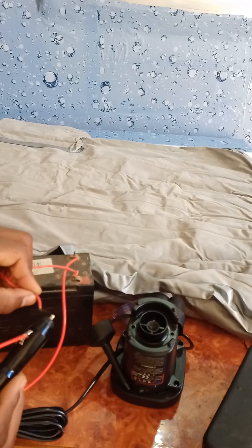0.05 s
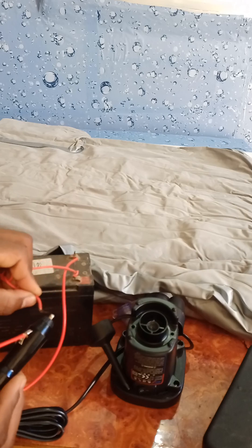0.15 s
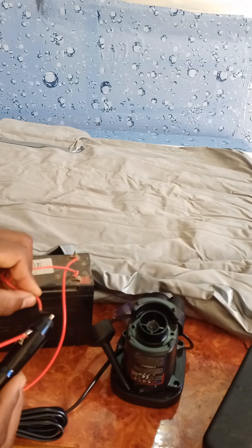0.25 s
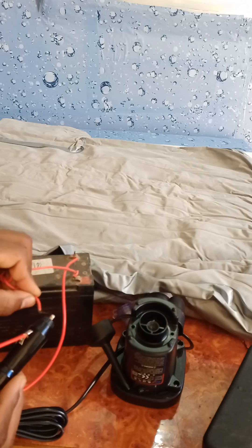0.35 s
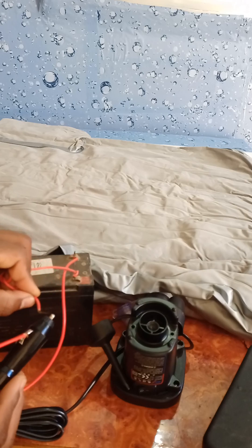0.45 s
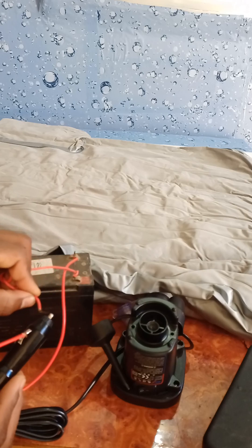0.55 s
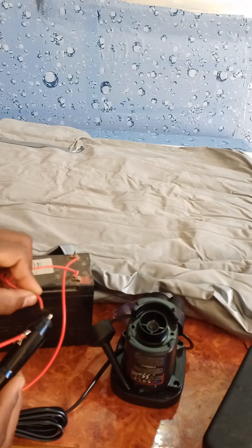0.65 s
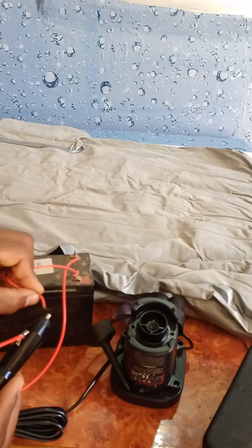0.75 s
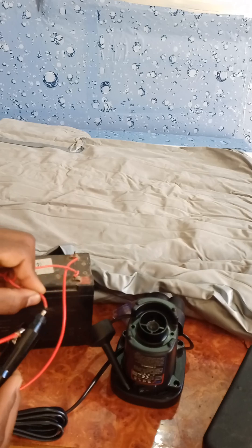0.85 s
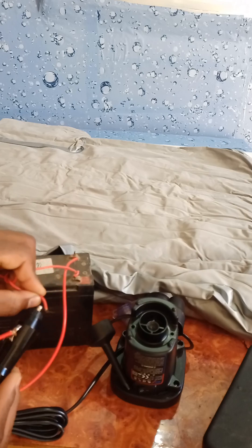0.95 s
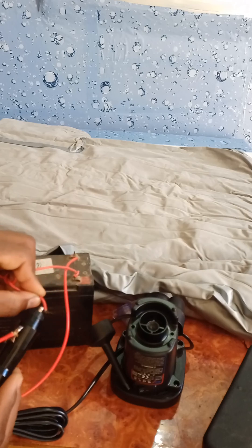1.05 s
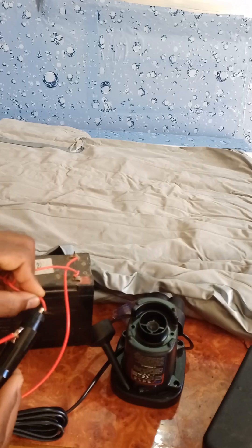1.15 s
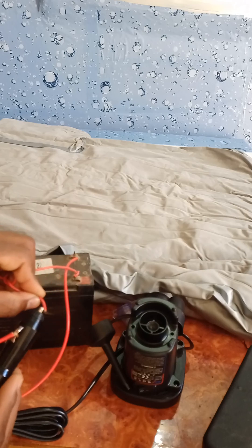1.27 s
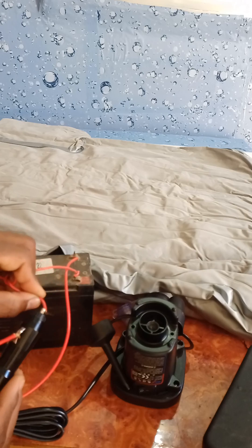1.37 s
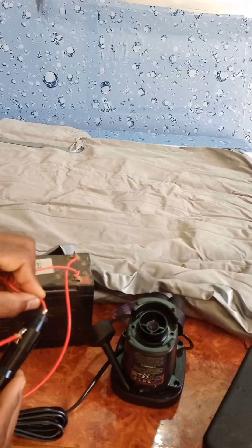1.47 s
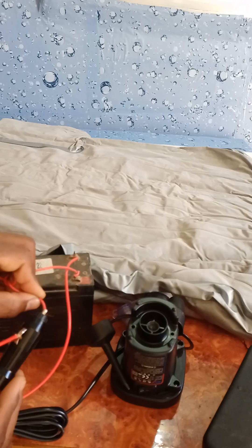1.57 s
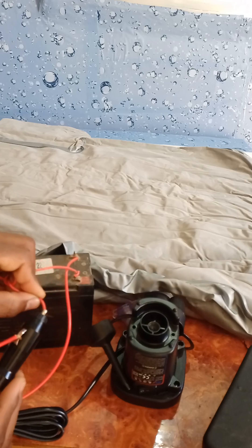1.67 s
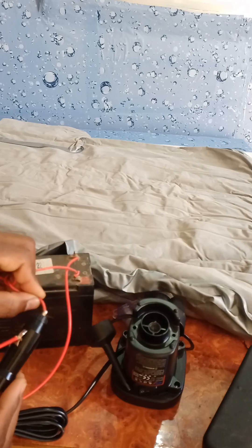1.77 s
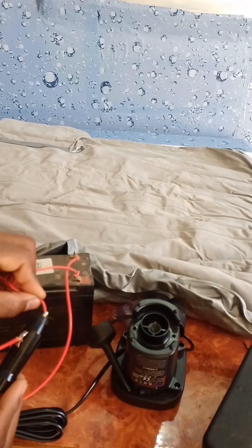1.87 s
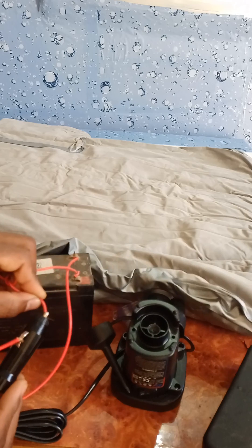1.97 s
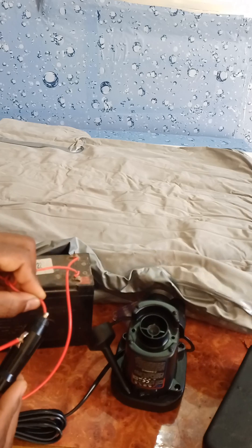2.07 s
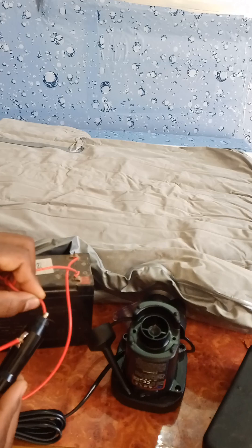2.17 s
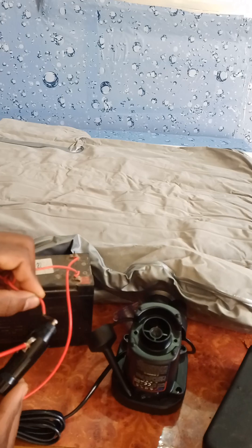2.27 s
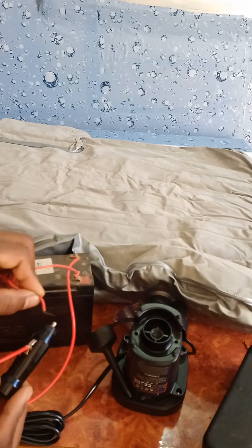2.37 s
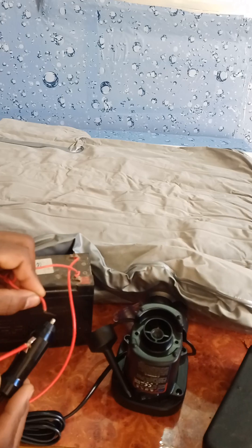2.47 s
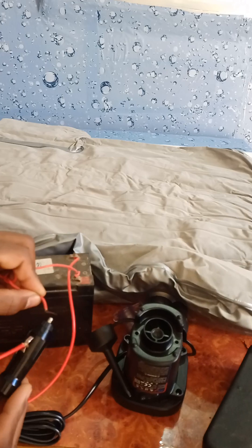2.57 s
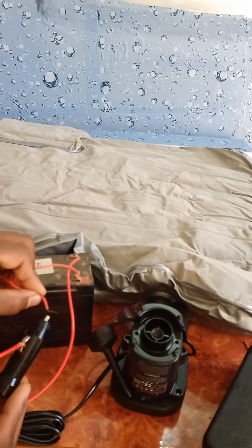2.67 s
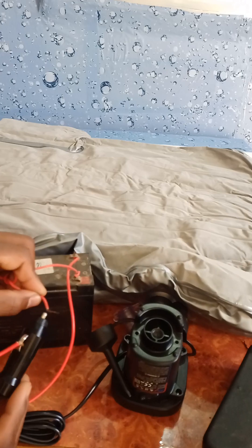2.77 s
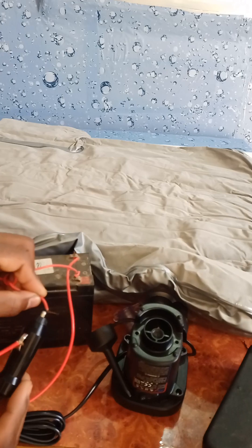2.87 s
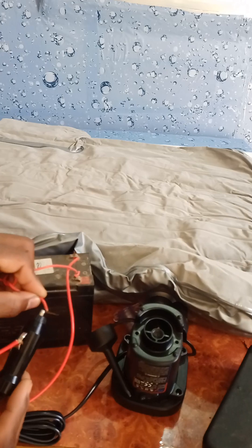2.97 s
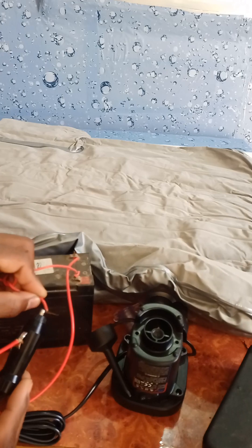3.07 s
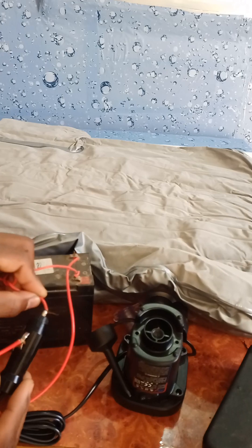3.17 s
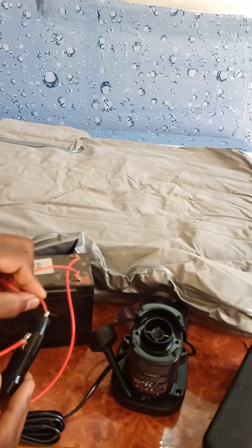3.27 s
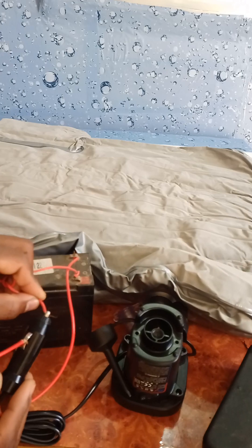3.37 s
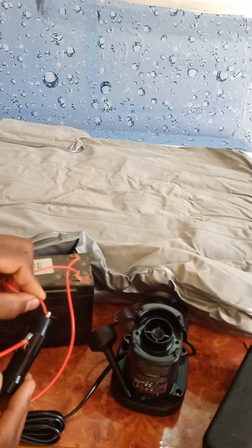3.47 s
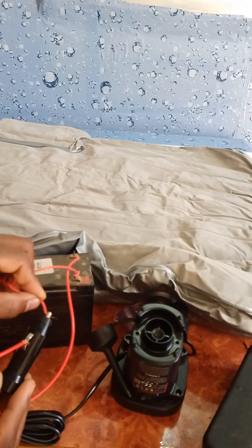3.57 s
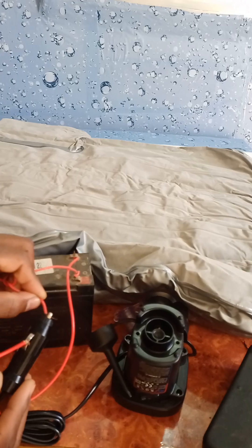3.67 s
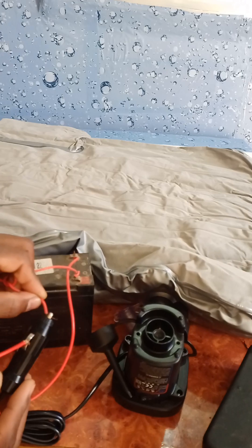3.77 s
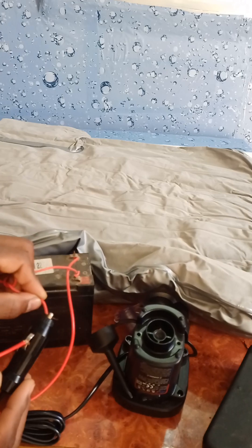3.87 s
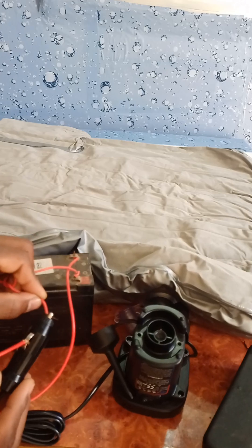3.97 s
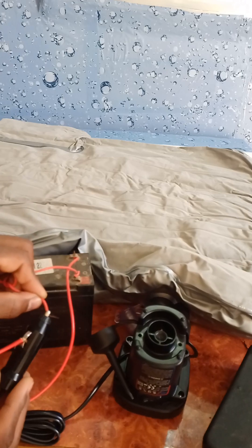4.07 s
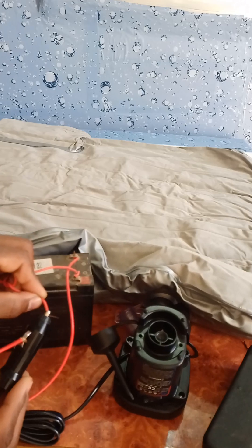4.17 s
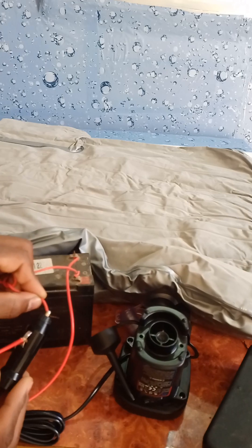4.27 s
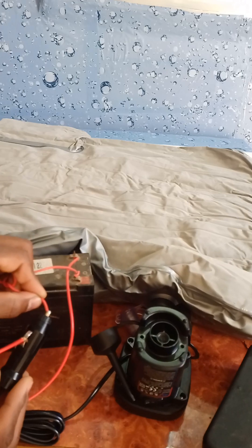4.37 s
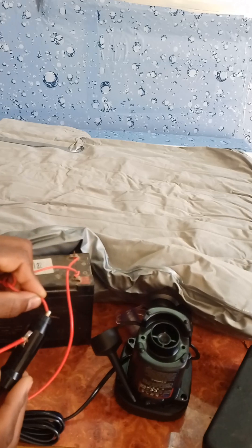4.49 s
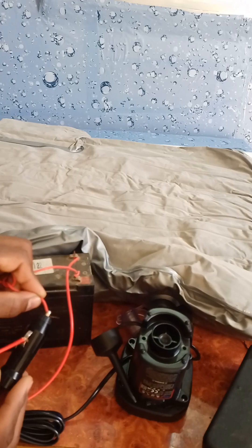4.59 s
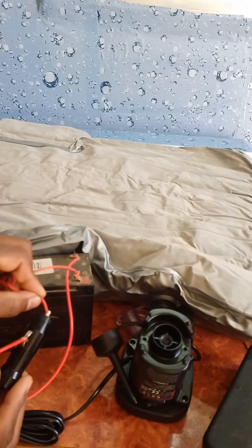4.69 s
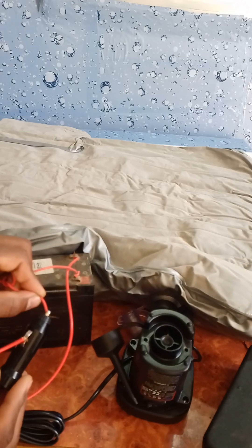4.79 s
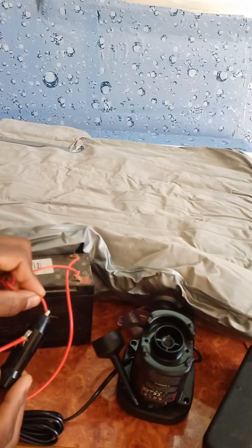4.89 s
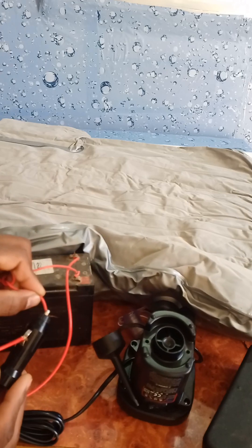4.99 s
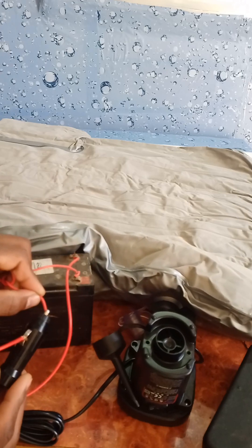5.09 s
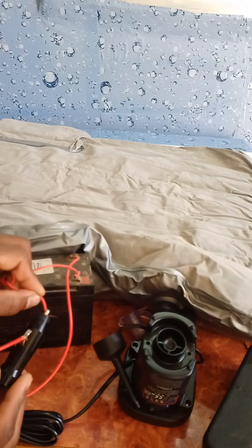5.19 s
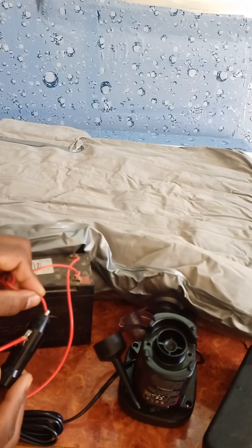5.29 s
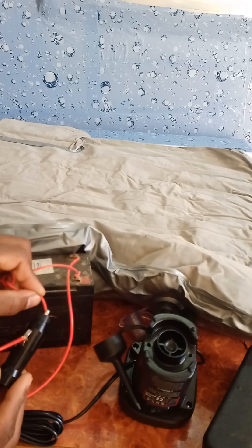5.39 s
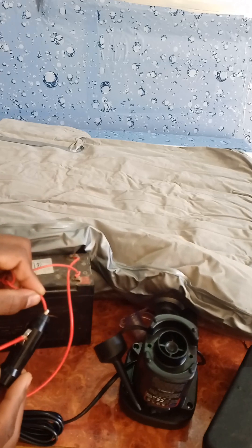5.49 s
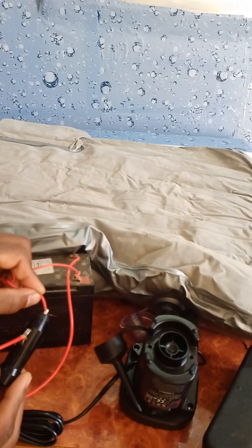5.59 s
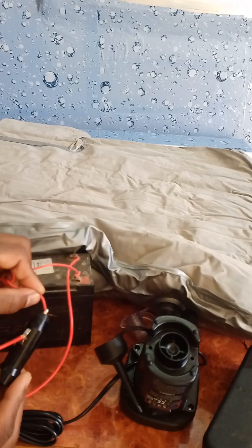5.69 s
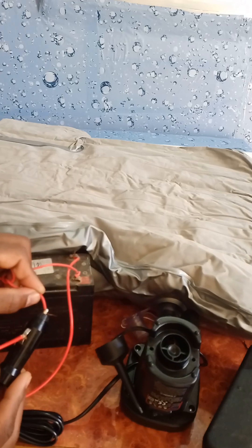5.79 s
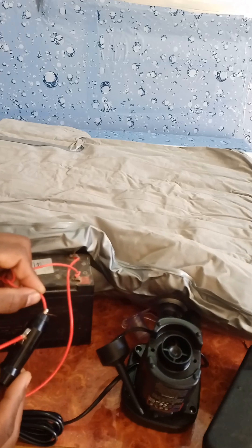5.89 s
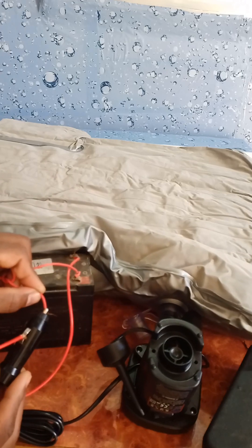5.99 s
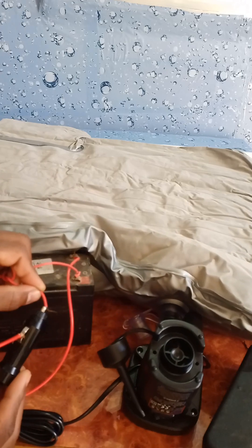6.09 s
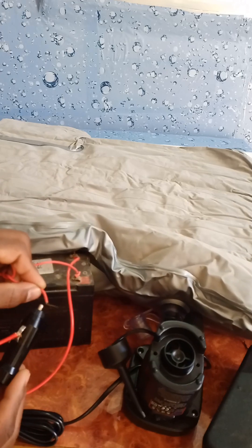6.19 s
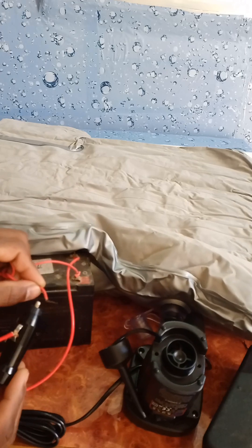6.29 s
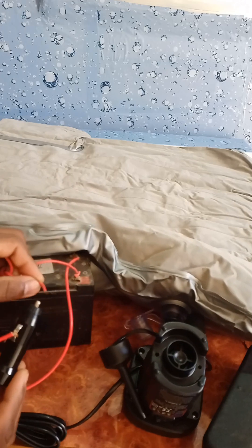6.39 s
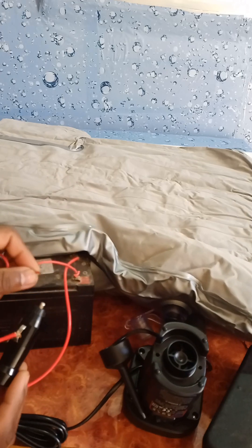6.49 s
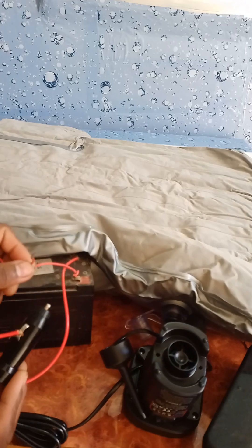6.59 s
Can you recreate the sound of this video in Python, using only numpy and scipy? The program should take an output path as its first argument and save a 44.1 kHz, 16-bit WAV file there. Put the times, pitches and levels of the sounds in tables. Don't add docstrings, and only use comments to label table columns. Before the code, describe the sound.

A quiet small room with faint hand shuffles on a mattress and a few dry metal clamp ticks. A small electric blower then spins up quickly into a bright whine with rushing air, coasts down with a base rattle, restarts and holds a longer, nearly steady high whine before beginning to wind down. A close hand-held phone drifts around the inlet, changing the brightness.

```python
import sys
import numpy as np
from scipy import signal
from scipy.fft import rfft, irfft
from scipy.io import wavfile
from scipy.ndimage import uniform_filter1d

SR = 44100
rng = np.random.default_rng(int(sys.argv[2]) if len(sys.argv) > 2 else 0)


def undo_db(level):
    steps = np.asarray(level, float) / 20
    return 10 ** steps


def int16_out(signal):
    q = np.round(np.clip(np.atleast_2d(signal).T, -1, 1) * 32767)
    wavfile.write(sys.argv[1], SR, q.astype(np.int16))


N = 292855
T = np.arange(N) / SR
F = np.fft.rfftfreq(N, 1 / SR)
BLADES = 6
FULL_SPEED_HZ = 339.5

# contact made in seconds, contact broken in seconds.
POWER_ON = [
    (1.4684, 2.3659),
    (3.3282, 6.2234),
]
# centre in Hz, width in Hz, level in dB.
HOUSING = [(336, 300, -14), (564, 279, 0), (1073, 470, -0.5), (1386, 238, 0), (1657, 282, -0.5),
           (2150, 1700, -8.5), (3008, 230, -4), (2830, 220, 2), (4110, 810, -7), (4682, 190, 1),
           (6110, 1830, -13), (5834, 178, -4), (5980, 1310, -6.5), (7450, 410, -10), (7400, 480, -58),
           (9165, 800, -11.5), (10120, 540, -13.5), (10970, 720, -19.5), (11960, 120, -15.5),
           (13200, 900, -31), (14700, 910, -37)]
# time in seconds, nearness in dB, aim at the inlet from 0 to 1,
# place in the narrow treble beam in dB.
PHONE = [(1.5, -2.5, 0.37, -1.5), (1.68, 4.5, 0.18, -30), (1.8, -2, 0.45, -12), (2.14, 7, 0.53, 0),
         (2.33, 2, 0.28, 3.5), (2.6, -2.5, 0.6, -13), (3.1, -1.5, 0.08, -23), (3.5, -4.5, 0.37, -10.5),
         (4.05, 3, 0.22, 5), (4.35, -4, 0, -4), (4.6, 3, 0.3, 0.5), (4.8, 1, .4, -2.5),
         (4.95, 2.5, 0.61, 3.5), (5.13, -0.5, 0.94, -7), (5.32, 1.5, 0.88, 4), (5.8, -3, 0.96, 3),
         (6.2, -1, 0.65, 2), (6.6, -1.5, 0.25, -24)]


def unit(x):
    return x / np.sqrt(np.mean(x ** 2))


def curves(table):
    s, *columns = np.transpose(table)
    return [np.interp(T, s, c) for c in columns]


def resonance(f, hz, width):
    return 1 / (1 + (2 * (f - hz) / width) ** 2)


def coloured(gain):
    return unit(irfft(rfft(rng.standard_normal(N)) * gain, N))


def walk(rate_hz):
    return coloured(resonance(F, 0, 2 * rate_hz))


def movements():
    # start in seconds, hold in seconds,
    # shuffle in dB, cloth in dB, hiss in dB.
    shuffles = [
        (0.0, 0.11, -57, -69, -78),
        (.12, .02, -56, -73, -74),
        (.83, 0.13, -63.5, -78, -81.5),
        (0.963, .1, -65, -72, -76),
        (1.214, .04, -71, -77, -80),
        (1.32, 0.084, -63.5, -76, -84),
        (1.508, 6, -56.5, -46, -58),
    ]
    rise_db_s, fall_db_s, still_db = 500, 69, -90
    out = undo_db(still_db)
    for s, hold, *db in shuffles:
        before = np.clip(s - T, 0, None)
        after = np.clip(T - s - hold, 0, None)
        under_db = rise_db_s * before + fall_db_s * after
        out = np.maximum(out, undo_db(np.array(db)[:, None] - under_db))
    return out


def background():
    # frequency in Hz, level in dB per Hz.
    room_tone = [(18, -62), (30, -34), (102, -6), (123, -12.5), (505, -13.5), (546, -24), (591, -15),
                 (639, -21), (787, -24), (1680, -27), (15500, -41)]
    room_db = -64.5
    shuffle, cloth, hiss = movements()
    hz, db = np.transpose(room_tone)
    room = undo_db(room_db - 7.5) * coloured(undo_db(np.interp(np.log(F + 1), np.log(hz), db)))
    box = resonance(F, 340, 40) + 1.46 * resonance(F, 397, 60) + 0.93 * resonance(F, 242, 33)
    shuffle = shuffle * undo_db(-2.0 + 1.1 * walk(15)) * coloured(box)
    cloth = cloth * undo_db(-3.5 + 0.99 * walk(10)) * coloured(resonance(F, 1000, 1600))
    hiss = hiss * undo_db(2.5 + 1.5 * walk(11)) * coloured(resonance(F, 5200, 6000))
    return room + shuffle + cloth + hiss


def clamp():
    # start in seconds, peak in dB, treble in dB, dull knock in dB.
    ticks = [
        (1.0304, -41, -13, -31),
        (1.0829, -44, -23, -31),
        (1.4137, -60, -21, -17),
        (1.4601, -48, 1, 2),
    ]
    # centre in Hz, width in Hz, level in dB.
    metal = [(3500, 290, 5), (5040, 1400, -7), (6200, 800, 1), (9300, 1800, -3), (11800, 1500, -17)]
    out, t = np.zeros(N), np.arange(SR // 10) / SR
    f = np.fft.rfftfreq(len(t), 1 / SR)
    attack = 1 - np.exp(-t / 0.00055)
    shape = attack * (np.exp(-t / 0.0031) + 0.056 * np.exp(-t / 0.025))
    for s, db, treble_db, knock_db in ticks:
        gain = undo_db(1.8 * knock_db + 16) * resonance(f, 1400, 1000)
        for hz, width, ring_db in metal:
            lift_db = (hz > 6000) * (treble_db + 7.5)
            gain = gain + undo_db(ring_db + lift_db) * resonance(f, hz, width)
        noise = rng.standard_normal(len(t))
        tick = irfft(rfft(noise) * gain, len(t)) * shape
        out[int(s * SR):int(s * SR) + len(t)] += undo_db(db) * tick / np.abs(tick).max()
    return out


def shaft_speed():
    # time in seconds, blade rate in
    # Hz.
    top_speeds = [(1.5, 2126), (2.4, 1997), (3.3, 2080), (4.3, 2009), (4.7, 2023.5),
                  (5.1, 2044), (5.5, 2032.7), (5.9, 2045.3), (6.3, 2036)]
    motor_s, air_drag, friction = .4262, .00044, .608
    ms = np.arange(0, T[-1] + 1 / 1000, 1 / 1000)
    top_hz = np.interp(ms, *np.transpose(top_speeds))
    speed, hz = np.zeros(len(ms)), 0.
    for i, s in enumerate(ms):
        push = (top_hz[i] - hz) / motor_s + air_drag * top_hz[i] ** 2 + friction * top_hz[i]
        powered = any(on < s <= off for on, off in POWER_ON)
        hz += (powered * push - air_drag * hz ** 2 - friction * hz) / 1000
        speed[i] = hz
    return np.interp(T, ms, speed) / BLADES


def current():
    contact = sum((T > on) & (T <= off) for on, off in POWER_ON) * 1.
    return uniform_filter1d(contact, size=2000)


def decades(shaft):
    return np.log10(np.clip(shaft, 30, None) / FULL_SPEED_HZ)


def load(shaft):
    return current() * np.clip(1 - shaft / FULL_SPEED_HZ, 0, 1)


def groan(shaft):
    return undo_db(-52) * load(shaft) ** 3 * coloured(resonance(F, 520, 300))


def tone(angle, order, rough, rate_hz):
    rough = np.clip(rough, 0, 1)
    turbulence = (walk(rate_hz) + 1j * walk(rate_hz)) / np.sqrt(2)
    waver = np.sqrt(1 - rough ** 2) + rough * turbulence
    return np.sqrt(2) * np.real(waver * np.exp(1j * order * angle))


def motor(shaft, angle, air_db):
    # centre in Hz, width in Hz, level in dB.
    base = [(224, 56, -24.5), (180, 30, -41), (292, 35, -39)]
    # level at full speed in dB, resonance in Hz, its width in Hz, its lift in dB.
    motor_tones = [(-38, 1470, 280, 11), (-38.5, 670, 30, 2), (-41, 975, 50, 8)]
    # shaft multiple, level against the shaft tone in dB.
    knocks = [(2, -6), (3, -3), (4, -11), (5, -20)]
    rattle_hz, rattle_width_hz = 243, 26
    pull = load(shaft)
    shake = undo_db(-45 + 101 * decades(shaft) + 11 * curves(PHONE)[1])
    for hz, width, db in base:
        shake = shake + undo_db(db - 8 * pull) * resonance(shaft - 30 * pull, hz, width) ** 2
    out = shake * tone(angle, order=1, rough=0.2, rate_hz=21)

    spin = np.clip(shaft / 255, 0, 1) ** 8
    spin = spin * uniform_filter1d(current(), size=6000)
    for order, (db, hz, width, lift_db) in zip((5, 2, 3), motor_tones):
        level_db = db + lift_db * resonance(order * shaft, hz, width) + 1.5 * walk(3.1)
        out = out + spin * undo_db(level_db) * tone(angle, order, rough=0.46, rate_hz=14)

    knock = shake * undo_db(5.5 - 22 * pull) * resonance(shaft, rattle_hz, rattle_width_hz) ** 1.7
    for order, db in knocks:
        out = out + knock * undo_db(db) * tone(angle, order, rough=.3, rate_hz=15)
    wobble = undo_db(air_db + 7) * resonance(2 * shaft, rattle_hz, rattle_width_hz)
    return out + wobble * tone(angle, order=2, rough=0.057, rate_hz=17)


def housing_gain(hz):
    return np.sqrt(sum((undo_db(db) * resonance(hz, centre, width)) ** 2 for centre, width, db in HOUSING))


def inlet_gain(hz):
    return (1 + undo_db(21) * resonance(hz, 5800, 2400) ** 2) * housing_gain(hz) ** .25


def floor_echo(shaft):
    spacing_hz, depth_db = 220, 5
    steps = np.arange(0, SR / 2, spacing_hz)
    dips_db = depth_db * rng.standard_normal(len(steps)).clip(-2, .8)
    away = np.clip(5 * (1 - shaft / FULL_SPEED_HZ), 0, 1)
    return lambda order: undo_db(away * np.interp(order * shaft, steps, dips_db))


def whine(shaft, angle, echo):
    # level at full speed in dB, dB per decade of speed,
    # share of nearness, lift when aimed in dB, share of the beam.
    blade_tones = [(-24.5, 56.5, 1.23, -6, 0.022), (-44, 37.5, 1, 17, 0.11), (-32, 64.5, 0.15, 0, 1.5)]
    # centre in Hz, width in Hz,
    # lift in dB.
    ducts = [(1220, 360, 7.5), (1615, 270, 8.5), (690, 69, 10.5),
             (2780, 300, 6), (3450, 600, -9), (4550, 500, 10), (5180, 400, -9), (2300, 400, -6)]
    colour_power = (.4, .9, .5)
    near_db, aim, beam_db = curves(PHONE)
    out, slow = 0, 1 - shaft / FULL_SPEED_HZ
    beam_db = beam_db * (1 - slow) ** 5
    for k, (db, law_db, near, aim_db, beam) in enumerate(blade_tones):
        order = BLADES * (k + 1)
        hz_now = order * shaft
        colour = (housing_gain(hz_now) / housing_gain(order * FULL_SPEED_HZ)) ** colour_power[k]
        if k > 0:
            colour = colour * np.sqrt(echo(order))
        level_db = db + law_db * decades(shaft) + 6 * load(shaft)
        level_db = level_db + near * near_db + aim_db * aim + beam * beam_db
        for hz, width, lift_db in ducts:
            level_db = level_db + lift_db * resonance(hz_now, hz, width)
        rough = .12 + (.3, .8, .6)[k] * slow
        out = out + undo_db(level_db) * colour * tone(angle, order, rough, rate_hz=23)
    return out


def weak_tones(shaft, angle, air_db, echo):
    # shaft multiple, level at full speed in dB, roughness from 0
    weak_orders = [(4, -49, .6), (15, -62, .5), (20, -55, .4), (24, -50, .2), (30, -46, .2),
                   (36, -54, .2), (38, -68, .3), (40, -71, .3), (42, -63, .2), (45, -77, .3), (48, -68, .3),
                   (54, -70, .3), (60, -72, .3)]
    aim = curves(PHONE)[1]
    out, slow = 0, 1 - shaft / FULL_SPEED_HZ
    for order, db, rough in weak_orders:
        colour = inlet_gain(order * shaft) / inlet_gain(order * FULL_SPEED_HZ) * echo(order)
        level_db = db + air_db + 34 - 14 * np.sqrt(np.abs(slow)) - 6 * load(shaft)
        if order in (30, 36):
            level_db = level_db - 10 * (aim - .5)
        out = out + undo_db(level_db) * colour * tone(angle, order, rough + .5 * slow, rate_hz=20)
    return out


def air_level(shaft):
    near_db, aim, _ = curves(PHONE)
    return -32.5 + 64.5 * decades(shaft) + 9 * load(shaft) + 0.18 * near_db - 2 * aim


def rush(shaft, angle, air_db):
    slow = np.log2(np.clip(shaft, 100, None) / 340)
    out, gust = 0, walk(6.3)
    for hz, width, db in HOUSING:
        dull_db = (2.16 * slow - 0.12 * slow ** 2) * np.log2(hz / 2900)
        flicker_db = 0.23 * gust + 1.43 * walk(13)
        band = np.sqrt(width / 350) * coloured(resonance(F, hz, width))
        out = out + undo_db(db + dull_db + flicker_db) * band
    chop = 1 + 0.032 * np.cos(angle) + 0.19 * np.cos(BLADES * angle)
    return undo_db(air_db - 0.5) * out * chop


def draught(air_db):
    rumble = coloured(resonance(F, 95, 70) * (F / (F + 80)) ** 4)
    level_db = 0.27 * (air_db + 32) - 71 + 4 * walk(4.5)
    return undo_db(level_db) * rumble * (T > POWER_ON[0][0])


def walls(x):
    t60_s, wet_db = 0.54, -5.5
    t = np.arange(SR // 2) / SR
    tail = rng.standard_normal(len(t)) * 1000 ** (-t / t60_s) * (t > .004)
    tail = signal.lfilter([1], [1, -.4], tail)
    return undo_db(wet_db) * signal.fftconvolve(x, tail / np.sqrt(np.sum(tail ** 2)))[:N]


def scene():
    shaft = shaft_speed()
    angle = 2 * np.pi * np.cumsum(shaft) / SR
    air_db = air_level(shaft)
    echo = floor_echo(shaft)
    blower = whine(shaft, angle, echo) + weak_tones(shaft, angle, air_db, echo)
    blower = blower + motor(shaft, angle, air_db) + rush(shaft, angle, air_db)
    blower = blower * np.clip(shaft / 50, 0, 1) + groan(shaft)
    blower = signal.sosfilt(signal.butter(N=3, Wn=170, btype="high", fs=SR, output="sos"), blower)
    hz_per_s = np.abs(np.gradient(uniform_filter1d(shaft, size=2000))) * SR
    glide = np.clip(hz_per_s / 100, .25, 1)
    return (blower + walls(blower * glide) + clamp() + draught(air_db) + background())[None]


def top_cut(x):
    return signal.sosfilt(signal.butter(12, 15740, fs=SR, output="sos"), x)


def record(dry):
    fade = np.clip((T[-1] - T) / 0.05 + 0.5, 0, 1)
    rounded = .55 * np.tanh(dry / .55)
    thin = signal.sosfilt(signal.butter(N=2, Wn=55, btype="high", fs=SR, output="sos"), rounded)
    return top_cut(thin * fade)


dry = scene()
out = record(dry)
int16_out(out)
```